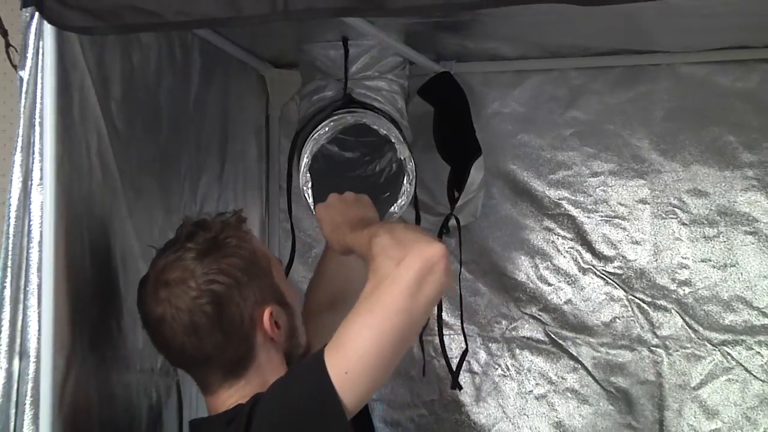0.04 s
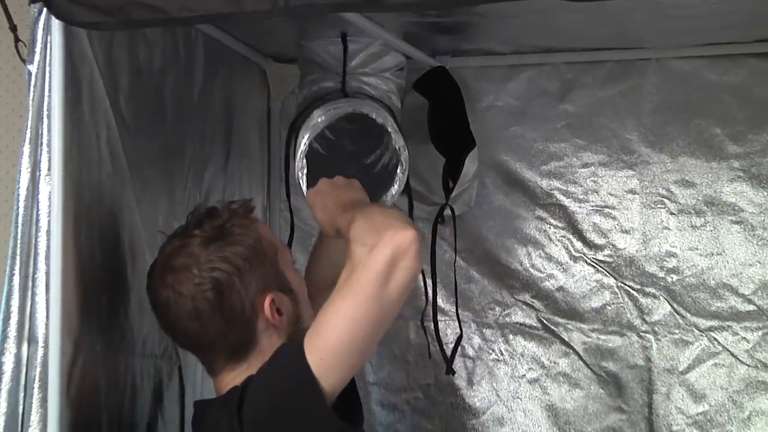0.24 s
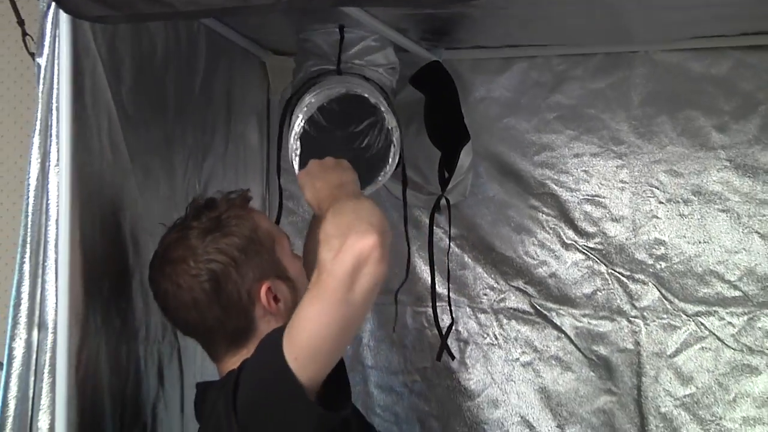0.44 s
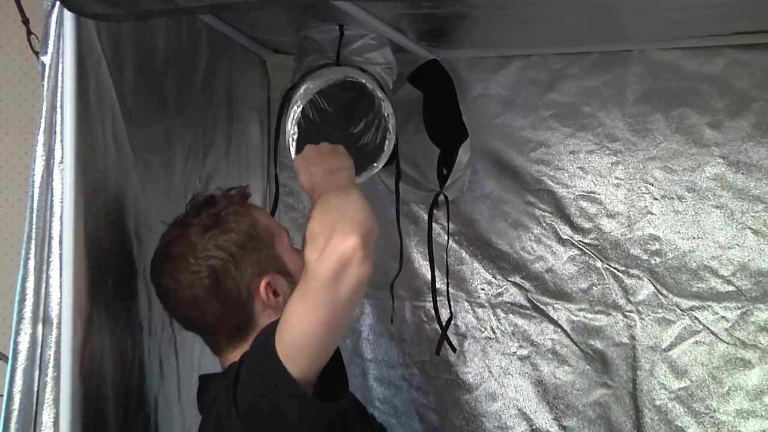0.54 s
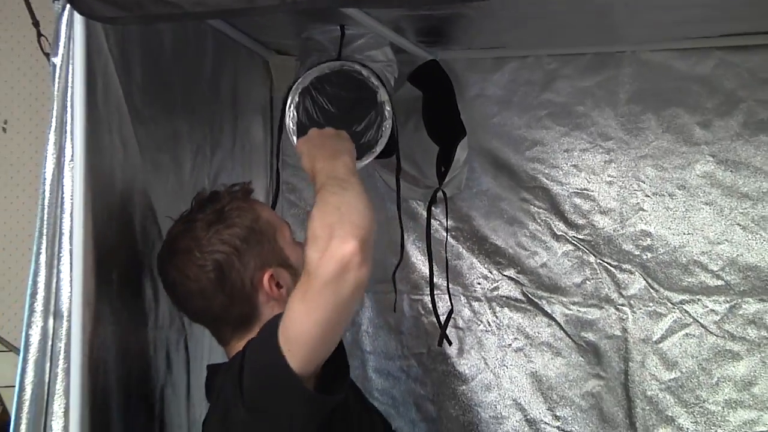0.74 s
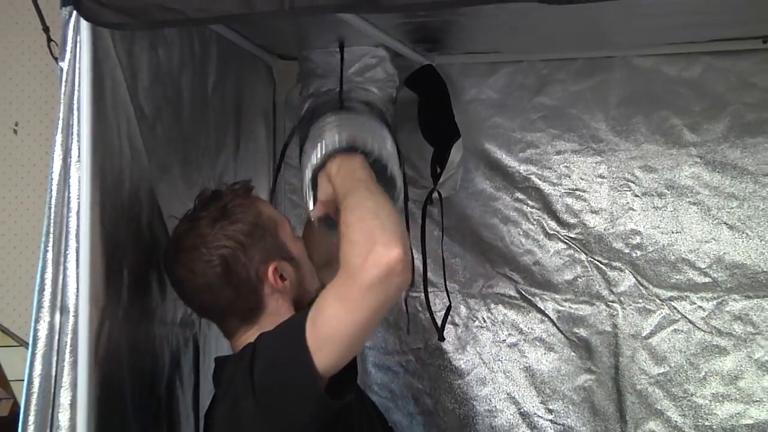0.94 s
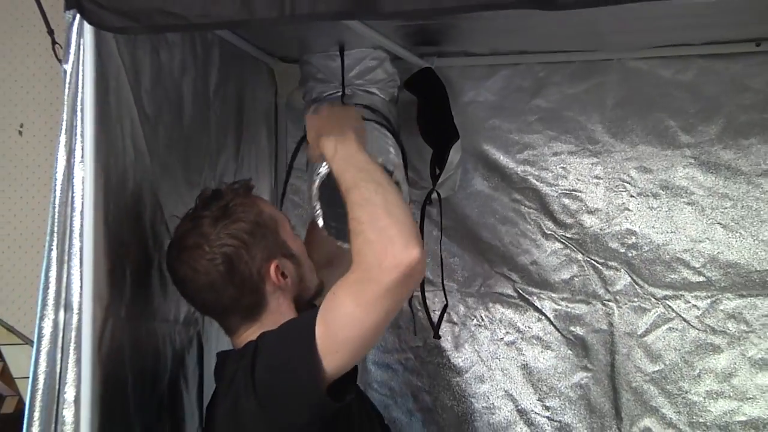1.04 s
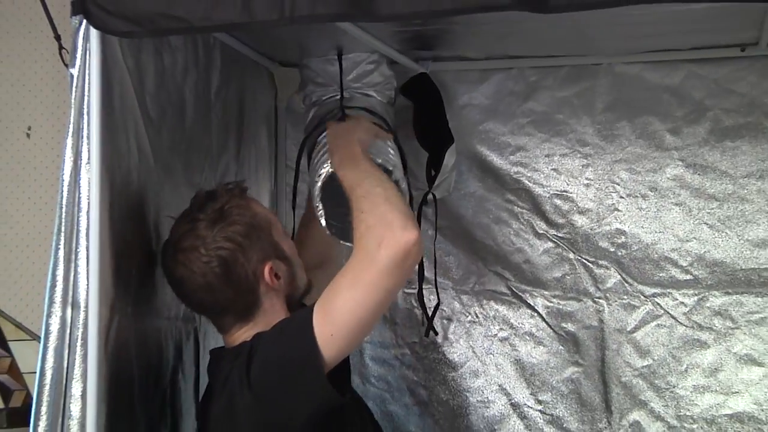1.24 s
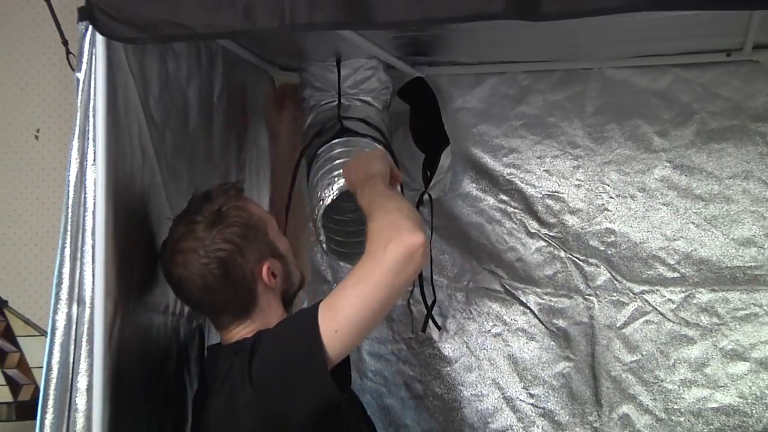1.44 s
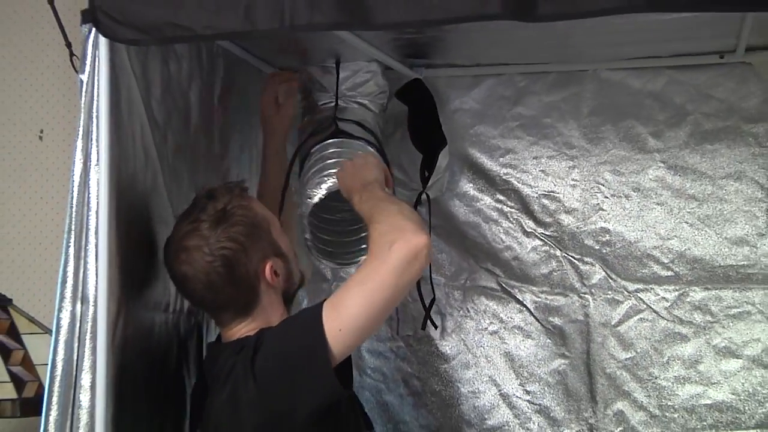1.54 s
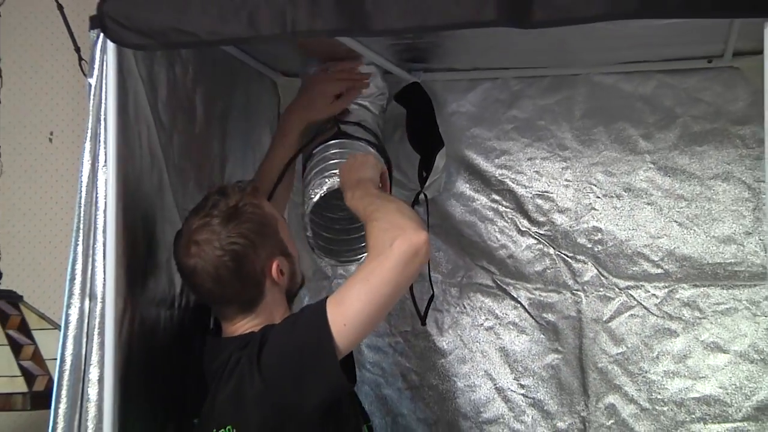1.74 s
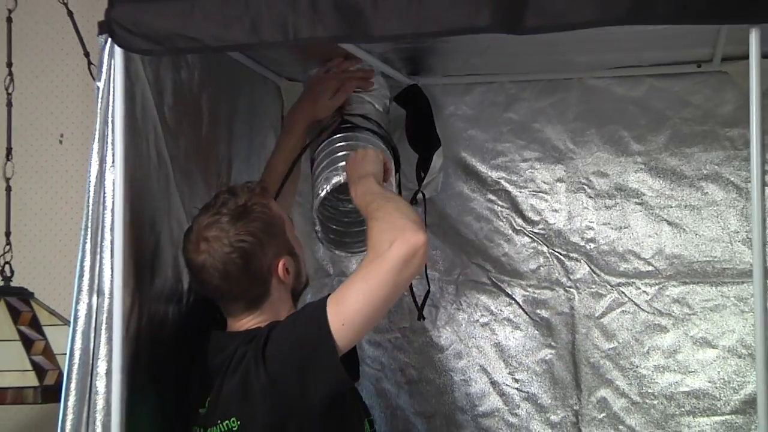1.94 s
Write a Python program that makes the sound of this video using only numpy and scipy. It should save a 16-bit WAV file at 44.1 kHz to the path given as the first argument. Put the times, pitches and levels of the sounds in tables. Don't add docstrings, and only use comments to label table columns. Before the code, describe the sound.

Foil ducting rustles softly with small crackles from the start, then from 0.25 to 0.6 seconds crunches loudly, with sharp snaps, tinny pings and hollow buckling pops. It eases by 0.75, with small crinkles and a dull pop near 0.9 and lighter rustling around 1.0. Sparse faint ticks follow until a soft last rustle from 1.8 to 2.0. Close, short tent reflections; low room noise.

```python
import sys
import numpy as np
from scipy import signal
from scipy.fft import rfft, irfft
from scipy.io import wavfile

SR = 44100
rng = np.random.default_rng(int(sys.argv[2]) if len(sys.argv) > 2 else 0)


def gain_from_decibels(decibels):
    exponent = np.asarray(decibels, float) / 20
    return 10 ** exponent


def wrap_up_sound(samples):
    columns = np.atleast_2d(samples).T
    tamed = np.clip(columns, -1, 1)
    steps = np.round(tamed * 32767).astype(np.int16)
    wavfile.write(sys.argv[1], SR, steps)


N = 88200
EVENT_N = SR // 3
ECHO_LAG = int(.0088 * SR)


def rms_one(x):
    return x / np.sqrt(np.mean(x ** 2) + 1e-20)


def in_time(rows):
    s, db = np.transpose(rows)
    return np.interp(np.arange(N) / SR, s, db)


def colour(x, points):
    hz = np.maximum(np.arange(len(x) // 2 + 1) * SR / len(x), 1)
    at, db = np.transpose(points)
    gain_db = np.interp(np.log(hz), np.log(at), db, left=-80, right=-80)
    return irfft(rfft(x) * gain_from_decibels(gain_db), len(x))


def drift(rate_hz):
    r = np.exp(-2 * np.pi * rate_hz / SR)
    slow = signal.lfilter([1], [1, -2 * r, r * r], rng.standard_normal(N + SR))[SR:]
    return rms_one(slow - slow.mean())


def resonate(x, hz, width_hz):
    r = np.exp(-np.pi * width_hz / SR)
    poles = [1, -2 * r * np.cos(2 * np.pi * hz / SR), r * r]
    return signal.lfilter([(1 - r * r) / 2, 0, -(1 - r * r) / 2], poles, x + 1e-18)


def butter(x, order, hz, kind):
    return signal.sosfilt(signal.butter(order, hz, kind, fs=SR, output="sos"), x)


def clicks(per_s, size_db):
    sizes = gain_from_decibels(size_db * np.minimum(rng.exponential(1, N), 3))
    sizes = sizes * rng.choice([-1, 1], N)
    return sizes * (rng.random(N) < per_s * gain_from_decibels(4.0 * drift(18)) / SR)


def decay(length, t60):
    return gain_from_decibels(-60 * np.arange(length) / SR / t60)


def tent(x, loss_db):
    noise = rng.standard_normal(EVENT_N)
    low = butter(noise, 2, 3000, "low")
    tail = low * decay(EVENT_N, 0.16) + (noise - low) * decay(EVENT_N, 0.17)
    echo = rng.standard_normal(EVENT_N) * decay(EVENT_N, .006)
    reply = np.zeros(EVENT_N + ECHO_LAG)
    reply[0] = 1
    reply[ECHO_LAG:] += gain_from_decibels(-1 - loss_db) * echo / np.linalg.norm(echo)
    reply[ECHO_LAG:] += gain_from_decibels(-3.5 - .5 * loss_db) * tail / np.linalg.norm(tail)
    return signal.fftconvolve(x, reply)


def play(table, sound, echo_loss_db):
    out = np.zeros(N + SR)
    for s, db, hz, shape in table:
        x = sound(hz, shape)
        x = tent(x / np.abs(x).max(), echo_loss_db)
        start = int(s * SR)
        out[start:start + len(x)] += gain_from_decibels(db) * x
    return out[:N]


# frequency in Hz, level in dB.
FLOOR_SPECTRUM = [(15, -52), (25, -3), (90, 0.5), (205, 8.5), (276, 1), (692, 7), (858, -0.5), (6680, -5),
                  (10000, -5), (15800, -14)]


def room_floor():
    return gain_from_decibels(-64) * rms_one(colour(rng.standard_normal(N), FLOOR_SPECTRUM))


# time in seconds, level in dB.
RUSTLE_EFFORT = [(0, -48.5), (.07, -49), (.21, -47), (.265, -33), (.335, -37), (.35, -31.5), (.41, -36.5),
                 (.455, -37.5), (.6, -37), (.75, -46.5), (.785, -54), (.84, -44.5), (.93, -50.5),
                 (1.0, -42.5), (1.08, -50), (1.23, -69), (1.31, -54.5), (1.36, -64.5), (1.38, -50.5),
                 (1.47, -52), (1.53, -61.5),
                 (1.6, -63.5),
    (1.8, -61),
    (1.83, -52.5),
    (1.92, -45),
    (2, -49.5),
]
# frequency in Hz, level in dB per Hz.
FOIL_SPECTRUM = [(410, -39), (700, -9), (1470, -10), (1770, -6.5), (2300, -7.5), (3400, -7.5), (7240, -7),
                 (10400, -12), (15800, -25)]


def rustle():
    ticks = clicks(per_s=2500, size_db=-1)
    dealt = rng.integers(0, 24, N)
    crinkles = np.zeros(N)
    for k, hz in enumerate(np.geomspace(800, 15000, 24)):
        ring = resonate(ticks * (dealt == k), hz, 1.96 * hz / 10)
        crinkles += ring * np.sqrt(min(hz, 4000) / hz)
    hiss = rng.standard_normal(N) * gain_from_decibels(1.5 * drift(18.0) + 0.5 * drift(14.5))
    mix = gain_from_decibels(-5.5) * rms_one(crinkles) + gain_from_decibels(-4.5) * hiss
    return gain_from_decibels(in_time(RUSTLE_EFFORT)) * rms_one(colour(mix, FOIL_SPECTRUM))


# time in seconds, level in dB.
FLEX_EFFORT = [(0, -52), (.125, -55.5), (.2, -42), (.25, -39.5), (.31, -34.5), (.38, -32.5), (.45, -37.5),
               (.57, -37), (.7, -51.5), (.775, -57.5), (.885, -49.5), (.905, -41.5), (1.07, -54.5),
               (1.14, -62), (1.2, -72.5), (1.35, -69), (1.42, -58), (1.6, -74), (1.76, -72),
               (1.82, -59.5),
    (2, -51),
]
# frequency in Hz, level in dB per Hz.
WALL_SPECTRUM = [(15, -81), (25, -44), (85, -17.5), (175, -9), (216, -1.5), (283, -3), (459, -1), (505, -3),
                 (612, -2.5), (2500, -17.5), (3250, -38), (5500, -120)]
# frequency in Hz, width in Hz, level in dB.
HOLLOW_MODES = [(211, 24, -11), (330, 140, -3.5), (390, 30, -8.5), (472.4, 48, 13), (507, 50, -28),
                (604, 34, -16), (780, 130, -6), (893, 114, 14), (1300, 360, -12)]


def flexing():
    dents = rms_one(clicks(per_s=900, size_db=4)) + 1.43 * rng.standard_normal(N)
    hollow = np.zeros(N)
    for k, (hz, width_hz, db) in enumerate(HOLLOW_MODES):
        hollow += (-1) ** k * gain_from_decibels(db) * resonate(dents, hz, width_hz)
    level = gain_from_decibels(in_time(FLEX_EFFORT) + 0.4)
    return level * rms_one(colour(dents + gain_from_decibels(-6.5) * hollow, WALL_SPECTRUM))


def crease(hz, octaves):
    crack, after = rng.standard_normal((2, EVENT_N))
    x = crack * decay(EVENT_N, .0095)
    x = x + gain_from_decibels(-14) * after * np.abs(crack[::-1]) * decay(EVENT_N, 0.091)
    half_band = 2 ** (max(octaves, .2) / 2)
    band = butter(x, 1, np.clip([hz / half_band, hz * half_band], 100, 19000), "band")
    broad = butter(x, 1, [900, 9000], "band")
    return butter(rms_one(band) + gain_from_decibels(-9.5) * rms_one(broad), 2, 11000, "low")


# start in seconds, peak in dB, centre in Hz, spread in octaves.
SNAP_EVENTS = [(0.02, -40, 1380, 1), (0.0815, -28, 5800, 0.25), (0.1579, -32, 1370, 0.43),
               (0.2453, -41, 4800, 1.5), (0.2915, -15.5, 4600, 1.9), (0.3438, -14, 4500, 1.5),
               (0.369, -32, 2940, 1.2), (0.3572, -16.5, 2800, 1.3), (0.3815, -20, 1520, 0.61),
               (0.4664, -14.5, 4500, 0.93), (0.5103, -18.5, 4500, 1.8), (0.5382, -18.5, 3470, 1.4),
               (0.6172, -24, 6350, 1.3), (.7971, -43, 2500, 1.9), (0.8178, -28, 5000, 1.1),
               (0.8926, -33.5, 1600, 0.68), (0.983, -37, 3800, 1), (1.258, -52, 3000, 2.5),
               (1.3159, -42.5, 6060, 0.39), (1.3685, -38.5, 3480, 2.1), (1.4973, -53, 4000, 2.5),
               (1.5528, -41.5, 11000, 0.73), (1.585, -46, 2900, 1.0), (1.653, -45, 2800, 1.1),
               (1.6615, -42.5, 2790, 0.9), (1.8196, -40, 3060, 2.6), (1.86, -44, 4100, 2.6),
               (1.932, -41, 3600, 2.6), (0.255, -33, 6000, 1.5), (0.731, -30.5, 11400, 0.9)]


def snaps():
    return play(SNAP_EVENTS, crease, echo_loss_db=0)


# start in seconds, peak in dB, centre in Hz, spread in octaves.
CRACKLE_EVENTS = [(.0893, -20, 9700, 0.84), (.3517, -20, 8500, 1.0), (.3555, -15, 4000, 1.3),
                  (.3595, -22, 5500, 1.6), (.3685, -26, 6000, 1.8), (.4665, -24, 10500, 0.55),
                  (.4755, -17, 5700, 0.9), (.484, -24, 7500, 1.2), (.5465, -18.5, 5300, 0.96),
                  (.249, -27, 6800, .5), (.9015, -38, 2000, 0.72), (0.17, -40, 4000, 2.2),
                  (.5245, -28, 8000, 1.2), (0.32, -20, 5500, 1.4), (.705, -33, 9700, .9),
                  (.756, -35, 8800, 1.0), (.392, -21, 2800, 1.5), (.378, -25.5, 3400, 1.4),
                  (.908, -35, 2500, 1.0), (.93, -34, 2300, .8), (0.71, -28, 4500, 1.4),
                  (.022, -35, 10000, 1.0), (1.7, -47.5, 1100, 0.53), (2, -42, 8000, 1.0),
                  (0.26, -27, 11000, .9), (.3015, -23, 11000, .6), (.477, -22.5, 12000, 0.72),
                  (0.68, -27.5, 10500, .8), (1.3695, -41, 5200, .5), (1.378, -45, 5300, .5)]


def crackles():
    return play(CRACKLE_EVENTS, crease, echo_loss_db=12)


def panel(hz, t60, thud_db):
    kick = rng.standard_normal(EVENT_N) * (1 - decay(EVENT_N, 7 * 1.36 / hz))
    ring = resonate(kick * decay(EVENT_N, 0.34 * t60), hz, np.log(1000) / np.pi / t60)
    ring = resonate(ring, hz, hz)
    thud = resonate(kick * decay(EVENT_N, t60), hz, 1.55 * hz)
    thud = resonate(thud, hz, 2.0 * hz)
    x = rms_one(ring) + gain_from_decibels(thud_db) * rms_one(thud)
    return butter(x, 2, min(144, 2.4 * hz), "high")


# start in seconds, peak in dB, pitch in Hz, ring t60 in seconds.
BUCKLE_EVENTS = [(0.157, -38.5, 920, 0.036), (.192, -49, 564, 0.11), (.239, -21, 463, 0.044),
                 (.26, -18.5, 700, 0.053), (0.3432, -19.5, 466, 0.13), (.36, -23, 443, 0.21),
                 (.381, -22.5, 1495, 0.04), (.465, -25, 504, 0.052), (.5465, -22, 1610, .05),
                 (0.573, -33.5, 249, .1), (.8925, -36, 890, 0.016), (.902, -30.5, 330, 0.022),
                 (.921, -45, 714, 0.04), (0.98, -43, 243, 0.062), (1.031, -39, 405, 0.034),
                 (1.07, -46, 436, 0.035), (1.784, -47.5, 554, 0.11), (1.933, -37, 1140, 0.029),
                 (.38, -38.5, 88, 0.095), (.226, -26, 463, 0.12), (0.346, -17, 1186, 0.013),
                 (0.894, -36, 1560, 0.021), (.16, -42, 1330, 0.015), (1.935, -57, 79.5, 0.14)]


def buckles():
    return play(BUCKLE_EVENTS, lambda hz, t60: panel(hz, t60, thud_db=2), echo_loss_db=7)


# start in seconds, peak in dB,
# pitch in Hz, ring t60 in seconds.
PING_EVENTS = [(.5385, -16.5, 1080, 0.011), (.5383, -13, 2900, 0.0042), (.4664, -16.5, 5050, 0.0077),
               (.8928, -31.5, 1690, 0.012), (1.5, -40.5, 970, 0.02), (1.423, -37.5, 925, 0.028),
               (1.933, -48, 1180, 0.023), (1.029, -38.5, 246, 0.034), (0.25, -29, 1040, 0.011),
               (1.6612, -45, 3460, .008), (0.8925, -27, 960, 0.012), (1.1, -36, 1130, .012),
               (1.029, -39, 485, 0.029), (.895, -34, 228, 0.022), (.903, -31, 430, 0.017),
               (.921, -33, 1150, .008), (.927, -32.5, 720, .014), (1.009, -39, 2900, .012),
               (.358, -20, 520, .016), (.3825, -17.5, 567, 0.014), (0.18, -38, 1260, .008),
               (.8165, -32, 2120, 0.0085), (.3555, -17, 3900, 0.0088), (.356, -19.5, 2050, 0.0069),
               (.5105, -23, 1830, 0.0082), (.5465, -19, 1960, 0.0079)]


def pings():
    return play(PING_EVENTS, lambda hz, t60: panel(hz, t60, thud_db=-22), echo_loss_db=9)


def scene():
    handling = rustle() + flexing()
    wall_echo = gain_from_decibels(-15.0) * np.r_[np.zeros(ECHO_LAG), handling[:-ECHO_LAG]]
    events = snaps() + crackles() + buckles() + pings()
    return (room_floor() + handling + wall_echo + events)[None]


def low_pass(x):
    return signal.sosfilt(signal.butter(12, 15990, fs=SR, output="sos"), x)


def record(dry):
    x = butter(dry, 2, 70, "high")
    x = signal.sosfilt(signal.cheby2(20, 60, 16050, fs=SR, output="sos"), x)
    return low_pass(x)


dry = scene()
out = record(dry)
wrap_up_sound(out)
```